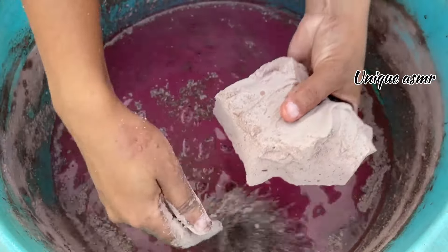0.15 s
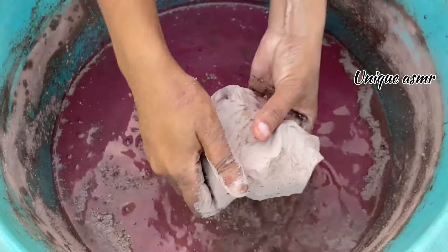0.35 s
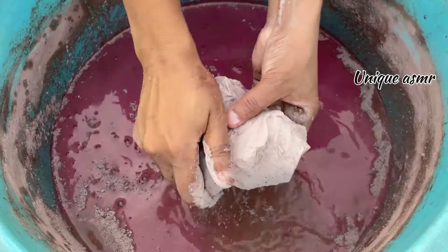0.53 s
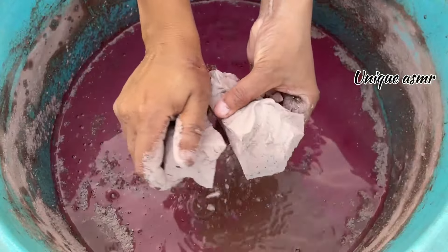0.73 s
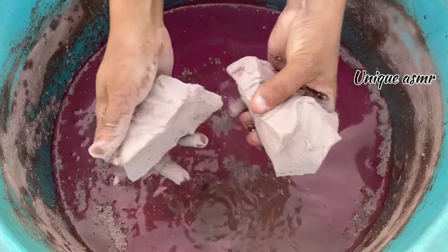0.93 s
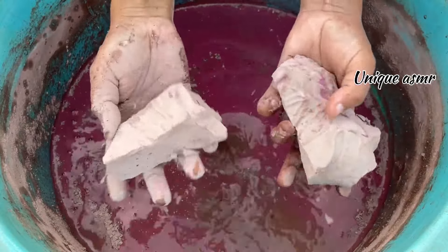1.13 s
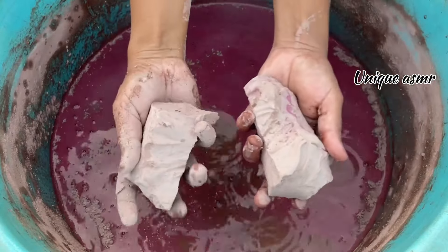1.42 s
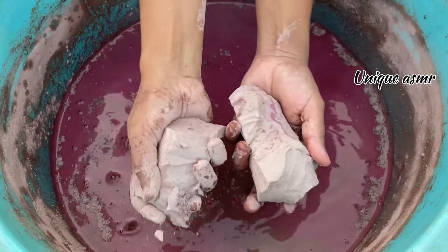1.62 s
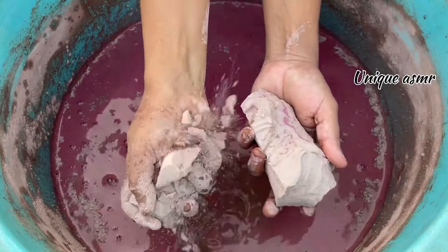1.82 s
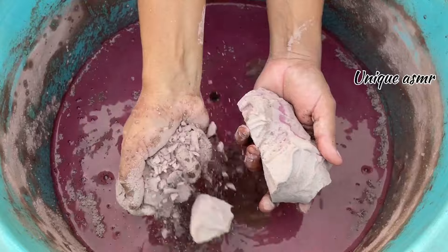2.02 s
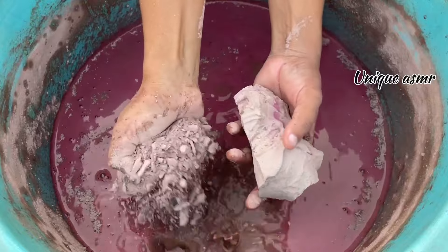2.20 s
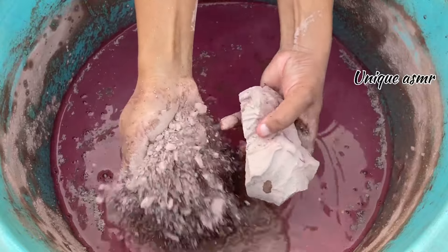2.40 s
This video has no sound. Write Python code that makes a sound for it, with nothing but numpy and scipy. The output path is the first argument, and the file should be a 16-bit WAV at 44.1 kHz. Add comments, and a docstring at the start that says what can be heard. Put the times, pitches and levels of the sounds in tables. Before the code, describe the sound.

Crunchy crushing of dry clay over water, with plinking drops and one deep plop near the end

```python
"""Dry mud snaps and crushes, crumbs and drips plink into water, one lump plunges in; far off, traffic and a horn.
Place: hands break the chunks over a plastic basin of water. Distance: the basin is close, the street far.
Microphone: a phone with two ports, out of phase in the treble, rounding off the loudest peaks.
Mud is made of random fractures in shaped noise, water of decaying or gliding sines, the basin wall of a short
noise tail, traffic of coloured noise and the horn of two wavering harmonics."""
import sys
import numpy as np
from scipy import signal
from scipy.fft import rfft, irfft, next_fast_len
from scipy.io import wavfile
from scipy.ndimage import uniform_filter1d, map_coordinates

SR = 44100
rng = np.random.default_rng(int(sys.argv[2]) if len(sys.argv) > 2 else 0)


def bounce(signal):
    """Save signal as a 16-bit WAV file at the path given by the first command-line argument."""
    frames = np.transpose(np.atleast_2d(signal))
    limited = np.clip(frames, -1, 1)
    pcm = np.round(limited * 32767).astype(np.int16)
    wavfile.write(sys.argv[1], SR, pcm)


N = 112454

# far traffic with microphone hiss: (frequency [Hz], level [dB])
TRAFFIC_SPECTRUM = [(18, -50), (30, -10), (45, -3.5), (95, 1.5), (150, -4), (260, -11.5), (800, -25),
                    (1200, -37), (5000, -42.5), (8000, -29.5), (12000, -35), (16500, -43)]
# unrelated part of the traffic in the two ports: (frequency [Hz], side over mid [dB])
TRAFFIC_SPREAD = [(60, -52), (200, -20), (500, -3), (1500, 2.5), (4000, -10), (12000, -67)]
TRAFFIC_DB = -30

# crumbling and rubbing: (time [s], grit level [dB], level of crumbs pattering into the water [dB])
CRUMBLING = [(0, -46, -40), (.165, -41, -43), (.26, -46.5, -41), (.32, -48.5, -52), (.6, -53.5, -53.5),
             (.72, -44, -51), (.8, -36, -39), (.9, -43.5, -53.5), (1.1, -43, -43.5), (1.2, -52, -50.5),
             (1.27, -37.5, -52), (1.34, -45, -51.5), (1.7, -52, -49), (1.76, -39, -39), (1.92, -47, -49),
             (2.05, -38, -37.5), (2.38, -37, -37), (2.55, -33.5, -32.5)]
# colour of grit and dust: (frequency [Hz], level [dB])
GRIT_SPECTRUM = [(800, -47), (2000, -4.5), (4500, -0.5), (7000, 1), (10000, -10.5), (13000, -4),
                 (16500, -33)]
GRAINS_PER_S, GRAIN_SPREAD_DB = 2000, 5.5
DUST_DB = -3  # relative to the grains
PATTER_PER_S, PATTER_HZ, PATTER_SPREAD_OCT = 850, 1806, 0.704
PATTER_DECAY_CYCLES, PATTER_SPREAD_DB = 3.2, 2

# air gurgling in the water: (start [s], length [s], first pitch [Hz], last pitch [Hz], level [dB])
GURGLES = [(0.005, 0.124, 1171, 1106, -33), (2.387, .11, 496.5, 702, -28.5)]

# cracks of the mud and splashes: (time [s], treble peak [dB], body rms relative to that peak [dB])
CRACK_TIMES = [(0.0344, -33.5, 3.5), (0.122, -19, -5.5), (0.132, -30.5, -2), (0.1908, -18, -6.5),
               (0.2007, -10, -25), (0.209, -15, -7), (0.235, -34.5, 6.5), (0.385, -24, -37),
               (0.646, -16.5, -11), (0.6767, -27.5, -3), (1.012, -19.5, -22), (1.04, -25.5, -14),
               (1.071, -15.5, -16.5), (1.4071, -22, -8), (1.492, -23, -15), (1.5532, -21, -8.5),
               (1.7336, -23.5, -4), (1.78, -21, 0.5), (1.8186, -28, -3), (1.8261, -9, -5),
               (1.865, -28.5, 0), (1.88, -29.5, -3.5), (1.9493, -12, -9.5), (1.964, -21, -6),
               (1.9941, -20, 1.5), (2.0104, -16, -2), (2.05, -22.5, 0), (2.081, -14.5, -11),
               (2.14, -5.5, -18), (2.154, 0, -4.5), (2.2097, -16.5, -20), (2.2259, -14, 4.5),
               (2.2445, -2, -17.5), (2.266, -24, -2.5), (2.2818, -17, -7.5), (2.296, -4.5, -6.5),
               (2.3277, -22.5, 2.5), (2.3446, -9, -21), (2.413, -15, -14), (2.476, -26.5, 7)]
# colour of the crack treble: (frequency [Hz], level [dB])
CRACK_TREBLE = [(2500, -30), (3800, -2), (7000, 3.5), (12000, -6.5), (16500, -6.5)]
# colour of the crack body: (frequency [Hz], level [dB])
CRACK_BODY = [(400, 3), (2600, 5.5), (3500, -1.5), (5000, -10.5)]
# single sharp fractures: (time [s], level before softening [dB])
SHARP_FRACTURES = [(1.827, 0), (2.2291, 2), (2.2438, -17)]
CRACK_RISE_S, TREBLE_T60_S, BODY_T60_S = 0.0022, 0.024, 0.04
CRACK_GRAINS_PER_S = 7000
CREST_DB = 8  # peak over rms of a swarm

# drops ringing in the water: (time [s], level [dB], pitch [Hz])
DROPS = [(0.102, -17.5, 1090), (0.194, -17.5, 670), (0.255, -25, 1410), (0.463, -32, 1880),
         (.471, -30, 3460), (0.5893, -31, 2260), (0.907, -29.5, 2500), (.9713, -30.5, 1500),
         (1.0595, -27, 1970), (1.1219, -26.5, 1870), (1.1417, -19, 2880), (1.3098, -27.5, 2340),
         (1.4094, -11, 2566), (1.8269, -11.5, 1413), (1.9526, -10.5, 1365), (1.995, -20, 1390),
         (1.9971, -10, 2640), (2.012, -7.5, 760), (2.145, -7, 1196), (2.216, -14.5, 400),
         (2.2278, -4, 1820), (2.304, -20.5, 458), (2.3266, -17, 2170), (2.4353, -19, 2850),
         (2.485, -21, 595), (2.5256, -16, 1360)]
DROP_LIFE_S, DROP_ATTACK_S = 0.017, 0.00031  # life to -60 dB at 1 kHz, soft start
DROP_SHORTENS = 0.88  # power of pitch by which the life shortens
TAP_DB, TAP_PITCH, TAP_LIFE = -3.5, 1.35, 0.45  # tap relative to its drop; the last two are ratios

# loudness contour of the distant horn: (time [s], level [dB])
HORN_CONTOUR = [(0, -80), (0.202, -40.5), (.4, -48), (.8, -39.5), (1.2, -40), (1.35, -49.5), (1.6, -67)]
# harmonics of the horn from the fundamental up: (level [dB])
HORN_HARMONICS = [1, -5.5]
HORN_HZ = 418.6

SNAP_S, SNAP_DB, SNAP_HZ, SNAP_T60_S = .647, -0.5, 263, 0.029

# air pocket of the plunge: (pitch [Hz], level [dB], life [s], cut-off sharpness [power])
AIR_POCKET = [(661, 3, 0.046, 1.82), (445, 2.5, 0.052, 1.82), (542, 5.5, 0.045, 1.25),
              (225.3, -16.5, 0.47, 1.005)]
PLUNGE_S, PLUNGE_ATTACK_S, PLUNGE_SAG = 2.1555, 0.0053, -0.1

BASIN_T60_S, BASIN_DB = 0.083, -13

# phase between the microphone ports: (frequency [Hz], lead of the left port [half turns])
PORT_PHASE = [(2000, 0), (2500, .16), (4100, .22), (4570, .42), (5250, 2), (8500, 2.8), (11200, 3.15),
              (15300, 4)]
CEILING, KNEE = 1.0, 8  # full-scale limit, hardness of its knee
TOP_HZ = 16000


def amp(db):
    """dB to gain."""
    return 10 ** (np.asarray(db) / 20)


def unit(x):
    """Scale to rms 1."""
    return x / np.sqrt(np.mean(x ** 2) + 1e-20)


def along(points, hz):
    """Read (frequency [Hz], value) points on a log frequency axis."""
    f, v = np.transpose(points)
    return np.interp(np.log(hz + 1), np.log(f + 1), v)


def curves(rows):
    """One value per sample for each column after the time."""
    s, *cols = np.transpose(rows)
    return [np.interp(np.arange(N) / SR, s, c) for c in cols]


def wobble(rate):
    """A smooth random curve, rate knots a second."""
    knots = rng.standard_normal(int(N * rate / SR) + 4)
    return map_coordinates(knots, [np.arange(N) * rate / SR])


def filtered(x, response):
    """Multiply the spectrum of x by a response of frequency."""
    m = next_fast_len(N + 8192)
    return irfft(rfft(x, m) * response(np.fft.rfftfreq(m, 1 / SR)), m)[..., :N]


def coloured(x, spectrum):
    """Filter x by a (frequency [Hz], level [dB]) table."""
    return filtered(x, lambda hz: amp(along(spectrum, hz)))


def noise(spectrum):
    """Coloured noise of rms 1."""
    return unit(coloured(rng.standard_normal(N), spectrum))


def ring(s, db, hz, life, attack, rise=0, fall=1):
    """A sine starting at s and 60 dB down after its life; fall over 1 holds it, then cuts it off."""
    t = np.clip(np.arange(N) / SR - s, 0, 3 * life)
    envelope = amp(db - 60 * (t / life) ** fall) * (1 - np.exp(-t / attack))
    return envelope * np.sin(2 * np.pi * hz * t * (1 + rise * t / life))


def ticks(per_s, spread_db):
    """Random single-sample fractures of uneven size."""
    struck = rng.random(N) < per_s / SR
    size = amp(spread_db * np.minimum(rng.exponential(size=N), 3))
    return struck * rng.uniform(-0.94, 1, N) * size


def patchy(x, depth_db):
    """Random colour that changes every few milliseconds: each crumb has its own size."""
    z = signal.stft(x, nperseg=128)[2]
    field = uniform_filter1d(rng.standard_normal(z.shape), size=4, axis=0)
    field = uniform_filter1d(field, size=4, axis=1)
    return unit(signal.istft(z * amp(depth_db * unit(field)), nperseg=128)[1][:N])


def traffic():
    """Far traffic as slowly swelling noise; an unrelated side part makes it wider than the near sounds."""
    mid = amp(TRAFFIC_DB + 0.36 * wobble(2.7)) * noise(TRAFFIC_SPECTRUM)
    side = amp(TRAFFIC_DB) * coloured(noise(TRAFFIC_SPECTRUM), TRAFFIC_SPREAD)
    return np.array([mid + side, mid - side])


def grit():
    """Tiny fractures in clumps, over sifting dust."""
    clumps = amp(7.8 * wobble(40.5))
    grains = unit(coloured(ticks(GRAINS_PER_S, GRAIN_SPREAD_DB) * clumps, GRIT_SPECTRUM))
    dust = amp(DUST_DB) * noise(GRIT_SPECTRUM)
    return amp(curves(CRUMBLING)[0]) * patchy(grains + dust, depth_db=1.0)


def patter():
    """Small crumbs hitting the water: short bubbles of scattered pitch that glides upward."""
    u, z = rng.random((2400, 2)), rng.standard_normal((2400, 1))
    gaps = -np.log(u[:, :1] + 1e-9) / PATTER_PER_S
    start = (np.cumsum(gaps, axis=0) * SR).astype(int)
    hz = PATTER_HZ * 2 ** (PATTER_SPREAD_OCT * z)
    k = np.arange(800)  # samples within a bubble
    cycles = hz * k / SR
    size = amp(-PATTER_SPREAD_DB * np.log(u[:, 1:] + 0.034))
    envelope = size * np.exp(-cycles / PATTER_DECAY_CYCLES) * (1 - np.exp(-cycles))
    bubbles = envelope * np.sin(2 * np.pi * cycles * (1 + 0.0092 * cycles))
    out = np.bincount((start + k).ravel(), bubbles.ravel(), minlength=N)[:N]
    return amp(curves(CRUMBLING)[1]) * unit(out)


def gurgle(s, length, first_hz, last_hz, db):
    """A lumpy wavering tone that glides while an air pocket changes size."""
    u = np.clip((np.arange(N) / SR - s) / length, 0, 1)
    hz = (first_hz + (last_hz - first_hz) * u) * (1 + 0.043 * wobble(140))
    envelope = amp(db + 3.95 * wobble(110)) * np.abs(np.sin(np.pi * u)) ** .5
    return envelope * np.sin(2 * np.pi * np.cumsum(hz) / SR)


def swarm(s, db, t60):
    """Envelope of one crack: a steep rise to its peak, then a decay of 60 dB in t60."""
    after_peak = np.arange(N) / SR - s - CRACK_RISE_S
    return amp(db - 60 * np.clip(after_peak, 0, 1) / t60 - 12 * np.clip(-after_peak, 0, 1) / CRACK_RISE_S)


def fractures(spectrum):
    """Dense fractures of one colour, rms 1."""
    return patchy(coloured(ticks(CRACK_GRAINS_PER_S, spread_db=2.5), spectrum), depth_db=3.0)


def cracks():
    """Each crack is a quick swarm of fractures; treble and body have their own strength."""
    treble = sum(swarm(s, db - CREST_DB, TREBLE_T60_S) for s, db, body in CRACK_TIMES)
    low = sum(swarm(s, db + body, BODY_T60_S) for s, db, body in CRACK_TIMES)
    return treble * fractures(CRACK_TREBLE) + low * fractures(CRACK_BODY)


def sharp_fractures():
    """Single negative impulses, softened by a one-pole low-pass at 6 kHz."""
    s, db = np.transpose(SHARP_FRACTURES)
    impulses = np.bincount((s * SR).astype(int), amp(db), minlength=N)
    return -filtered(impulses, lambda hz: 1 / (1 + 1j * hz / 6000))


def drop(s, db, hz):
    """A higher, shorter tap on the surface and the bubble that it leaves."""
    life = DROP_LIFE_S * (1000 / hz) ** DROP_SHORTENS
    bubble = ring(s, db, hz, life, DROP_ATTACK_S, fall=1.4)
    tap = ring(s, db + TAP_DB, TAP_PITCH * hz, TAP_LIFE * life, DROP_ATTACK_S / 2)
    return bubble + tap


def horn():
    """A faint distant horn: two harmonics wavering in pitch and level, stronger in the left port."""
    phase = 2 * np.pi * np.cumsum(HORN_HZ + 0.87 * wobble(7.9)) / SR
    tone = sum(amp(db + 2.2 * wobble(9.3)) * np.sin((k + 1) * phase) for k, db in enumerate(HORN_HARMONICS))
    tone = tone * amp(curves(HORN_CONTOUR)[0])
    return np.array([1.04 * tone, 0.8 * tone])


def snap():
    """Dull thud of the chunk breaking in two: one low, fast-decaying sine."""
    return ring(SNAP_S, SNAP_DB, SNAP_HZ, SNAP_T60_S, 0.004)


def plunge():
    """The lump's air pocket booms and closes; the modes that cut off sharply also sag in pitch."""
    return sum(ring(PLUNGE_S, db, hz, life, PLUNGE_ATTACK_S, PLUNGE_SAG * (fall > 1.3), fall)
               for hz, db, life, fall in AIR_POCKET)


def basin(x):
    """Short scattered answer of the basin wall and water, different at each port."""
    t = np.arange(SR // 5) / SR
    tail = rng.standard_normal((2, len(t))) * amp(-60 * t / BASIN_T60_S) * (t > .001)
    return signal.fftconvolve(x[None], tail / np.linalg.norm(tail[0]), axes=1)[:, :N]


def scene():
    """Near sounds with the basin's answer, over the far street."""
    mud = grit() + cracks() + sharp_fractures() + snap()
    water = patter() + sum(gurgle(*row) for row in GURGLES) + sum(drop(*row) for row in DROPS) + plunge()
    near = mud + water
    return near + amp(BASIN_DB) * basin(near) + traffic() + horn()


def record(dry):
    """The two ports drift out of phase with frequency; peaks clip softly; nothing passes above the band limit."""
    f, lead = np.transpose(PORT_PHASE)
    sides = np.array([[1], [-1]])  # each port takes half of the phase
    x = filtered(dry, lambda hz: np.exp(.5j * np.pi * np.interp(hz, f, lead) * sides))
    x = x / (1 + np.abs(x / CEILING) ** KNEE) ** (1 / KNEE)
    return filtered(x, lambda hz: hz < TOP_HZ)


dry = scene()
out = record(dry)
bounce(out)
```